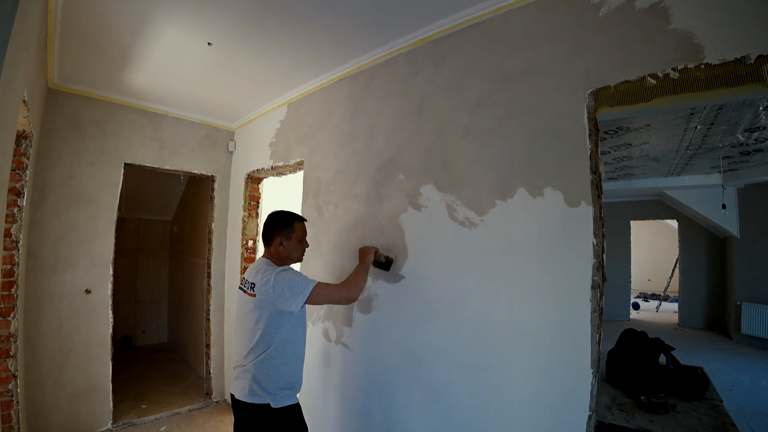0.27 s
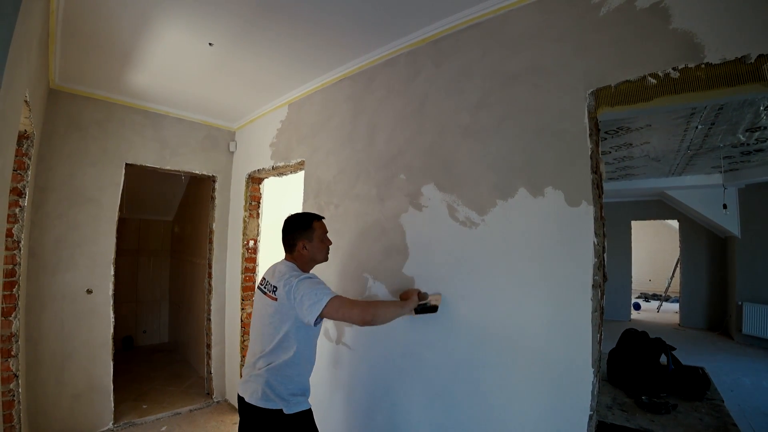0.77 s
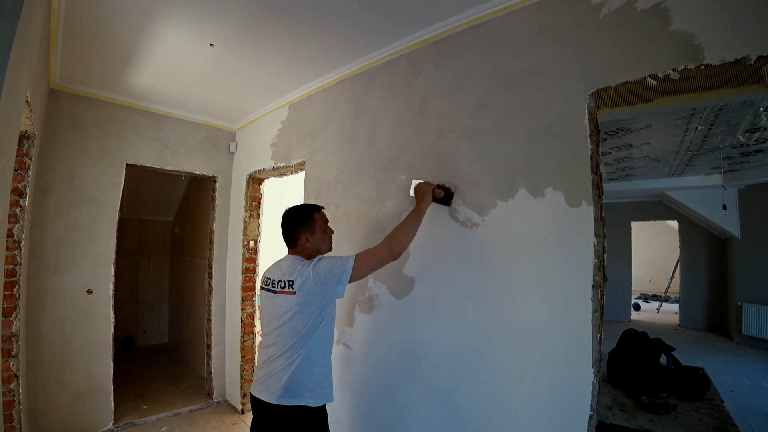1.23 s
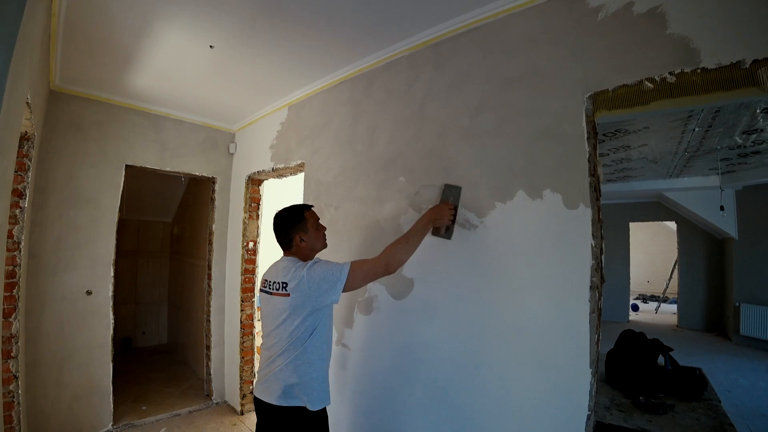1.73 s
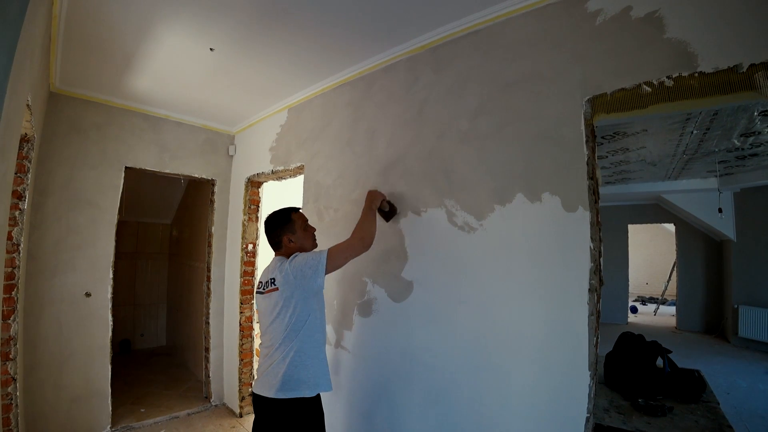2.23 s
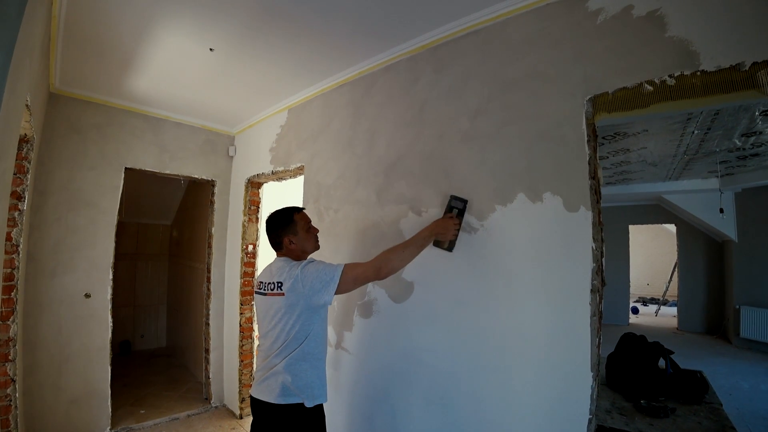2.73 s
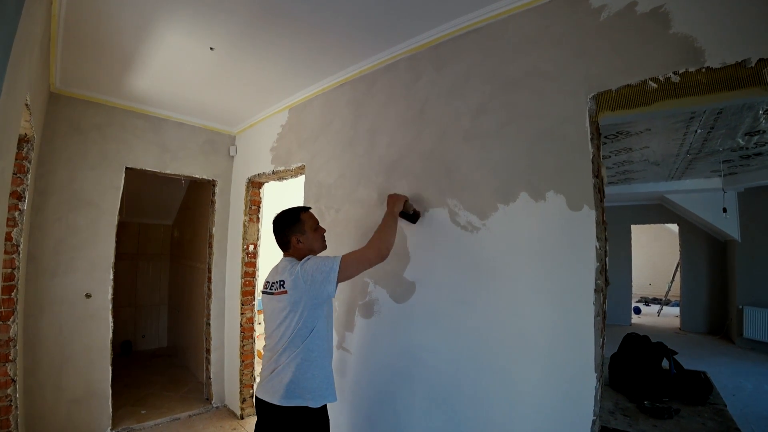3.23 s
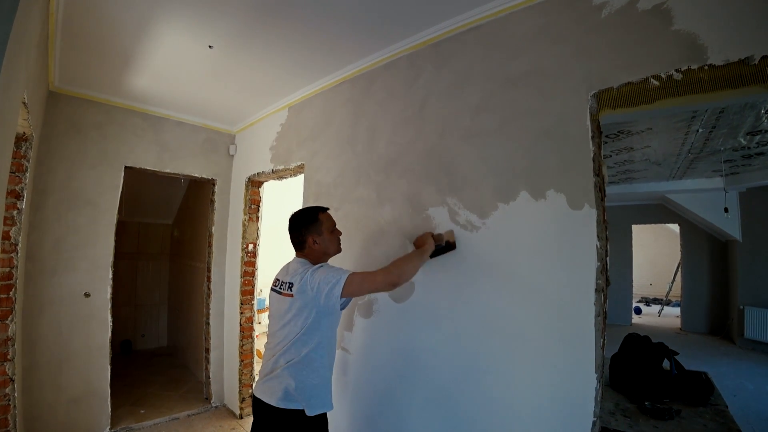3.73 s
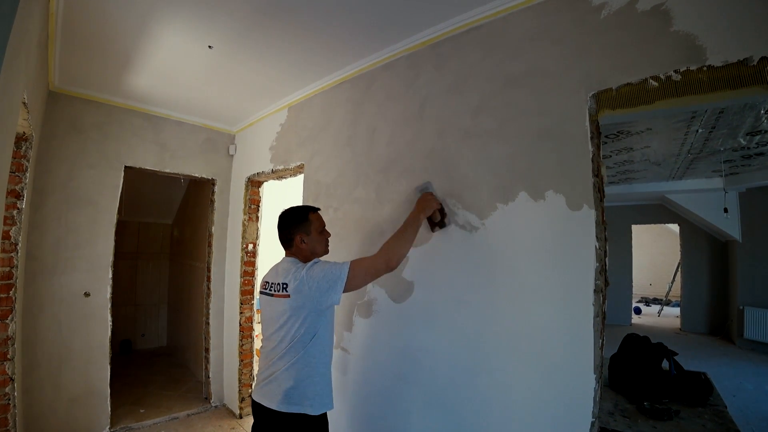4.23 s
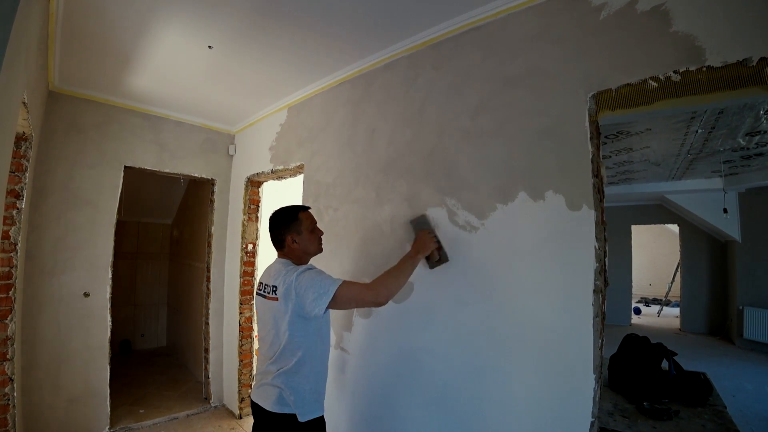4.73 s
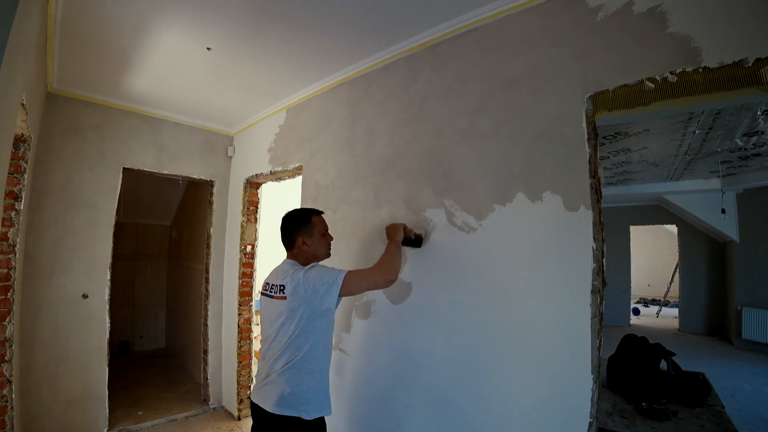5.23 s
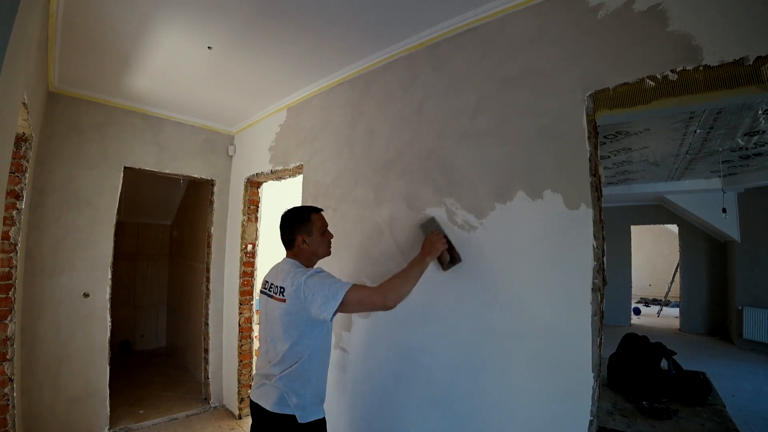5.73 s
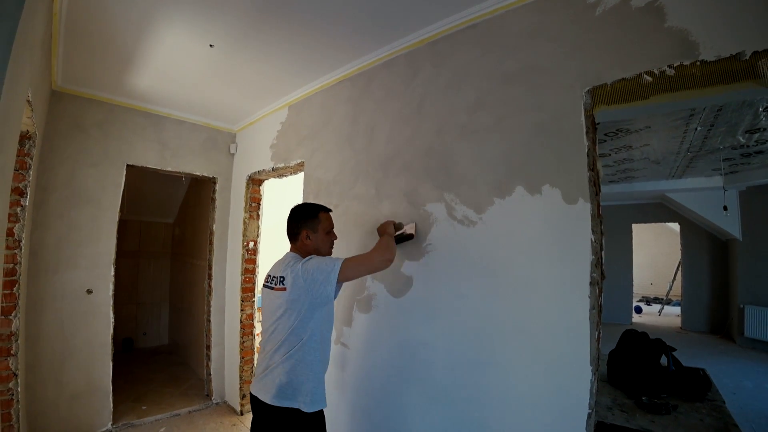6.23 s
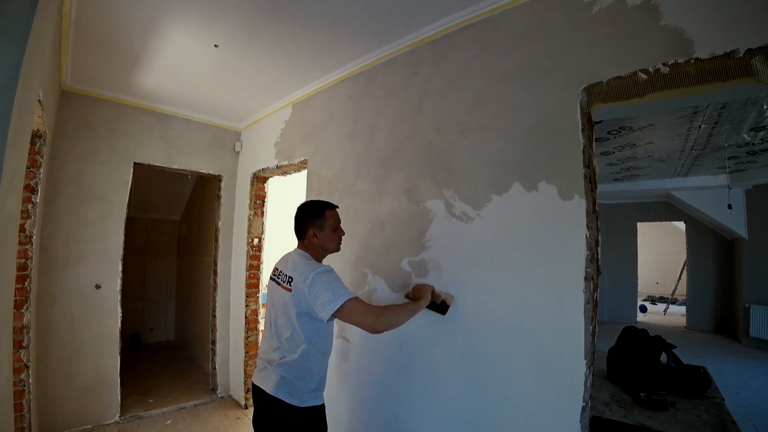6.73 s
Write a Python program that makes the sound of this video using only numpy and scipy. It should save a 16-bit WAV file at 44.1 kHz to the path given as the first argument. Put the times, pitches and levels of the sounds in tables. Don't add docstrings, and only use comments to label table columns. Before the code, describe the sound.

A steel trowel spreads gritty plaster in a bare, echoing interior, heard close through a small, bass-poor microphone pushed to its limit. A sharp tap at once starts a rasping sweep until 0.8 s, hollow wall drumming mixed with metallic ringing and sandy fizz. The echo dies away; a few tiny crumbs patter near 1.25 s. A brief, hard flick scrapes at 1.4 s and rings out. At 1.7 s the blade bites with chattering knocks and sweeps until 2.35 s. After a faint squeak, further strokes run from 2.85 to 3.9, 4.2 to 4.65 and 5.0 to 5.65 s, with clacks at contact and clicks on coarse stones. A thin high squeak at 5.8 s precedes the last scrape, 5.9 to 6.8 s, which decays into room echo and another squeak. Quiet rumble and dull floor knocks lie beneath.

```python
import sys
import numpy as np
from scipy import signal
from scipy.fft import rfft, irfft, next_fast_len
from scipy.io import wavfile
from scipy.ndimage import uniform_filter1d, map_coordinates

SR = 44100
rng = np.random.default_rng(int(sys.argv[2]) if len(sys.argv) > 2 else 0)


def volts(x):
    e = np.asarray(x, float) / 20
    return 10 ** e


def pcm_store(signal):
    levels = np.round(np.clip(np.atleast_2d(signal), -1, 1) * 32767)
    wavfile.write(sys.argv[1], SR, levels.astype(np.int16).T)


N = 307244


def evened(x):
    return x / np.sqrt(np.mean(x ** 2) + 1e-20)


def coloured(x, points):
    size = next_fast_len(len(x))
    f, db = np.transpose(points)
    hz = np.fft.rfftfreq(size, 1 / SR)
    curve_db = np.interp(np.log(hz + 1), np.log(f + 1), db)
    return irfft(rfft(x, size) * volts(curve_db), size)[:len(x)]


def add(mix, s, sound):
    part = mix[round(s * SR):][:len(sound)]
    part += sound[:len(part)]


def resonate(x, hz, width_hz):
    turn = np.exp(2j * np.pi * np.cumsum(hz * np.ones(len(x))) / SR)
    r = np.exp(-np.pi * width_hz / SR)
    return 2 * (turn * signal.lfilter([1 - r], [1, -r], x / turn + 1e-18)).real


def modes(x, table):
    wider = 1 / np.sqrt(np.sqrt(2) - 1)
    total = 0
    for k, (hz, width_hz, db) in enumerate(table):
        once = resonate(x, hz, wider * width_hz)
        total = total + (-1) ** k * volts(db) * resonate(once, hz, wider * width_hz)
    return total


def wander(count, span):
    return evened(uniform_filter1d(uniform_filter1d(rng.standard_normal(count), span), span))


def grit(count, per_s, spread_db):
    sizes_db = spread_db * np.minimum(rng.exponential(1, count), 3.2)
    sizes = volts(sizes_db) * rng.choice([-1., 1.], count)
    return evened(sizes * (rng.random(count) < per_s / SR))


def ringing(count, per_s, fixed, moving, moving_db):
    still = evened(modes(grit(count, per_s, spread_db=2.8), fixed)) * volts(1.3 * wander(count, span=1500))
    bent = evened(modes(grit(count, per_s, spread_db=2.9), moving)) * volts(1.1 * wander(count, span=1500))
    return evened((still + volts(moving_db) * bent) / np.hypot(1, volts(moving_db)))


def fizzing(t):
    # frequency in Hz, level in dB per Hz.
    sand_colour = [(2940, -2), (5000, 14.5), (6440, 13), (14400, 14.5), (15600, 14)]
    sand = coloured(grit(len(t), 16000, spread_db=1.0), sand_colour)
    since = t - t[0] - min(.32 * (t[-1] - t[0]), .26)
    gap_s = .0002 * (1 + 2.6 * since)
    bounce = map_coordinates(sand, [np.arange(len(t)) - SR * gap_s], order=3)
    sand = sand + .55 * np.exp(-(since / .06) ** 2) * bounce
    peak_hz = 10000 + 740 * wander(len(t), span=3000)
    return evened(sand + 0.014 * modes(sand, [(peak_hz, 2500, 0)]))


def stroke(rows, grip, load):
    # frequency in Hz, width in Hz, level in dB.
    blade = [(1535, 152, 10), (2233, 1190, 4)]
    # frequency in Hz, width in Hz, level in dB.
    panel = [(542, 155, -3), (770, 107, 6.5), (1197, 540, 1.5)]
    # time in s, half width in s, rasp in dB, rasp shift in Hz.
    patches = [(.15, 0.055, -1.5, 105), (.36, 0.24, -0.5, -400), (.55, 0.13, -2, 300), (1.8, 0.1, 3, 495),
               (1.98, 0.041, 6, -100), (2.3, 0.042, 0.5, -500), (2.93, 0.07, -3.5, 82),
               (3.12, 0.073, -1, 183), (3.5, 0.092, -2, 97), (3.84, 0.036, -1, -300),
               (4.3, 0.072, 3.5, -300), (4.63, 0.045, 0.5, 102), (5.09, 0.054, 2.5, -200),
               (5.225, 0.023, 3.5, 287), (5.34, 0.05, -1, 107), (6.02, 0.058, 1, -300),
               (6.19, 0.055, 1, 120), (6.45, 0.16, -2, 404)]
    upper_hz, upper_db, wall_bend_db, rasp_bend_db, palm_db = grip
    flat_hz, edge_hz, load_db, load_hz, turn_hz = load
    s, *columns = np.transpose(rows)
    t = np.arange(s[0], s[-1], 1 / SR)
    press_db, flat, speed = (np.interp(t, s, c) for c in columns)

    turn = np.exp(-((s[-1] - 0.14 - t) / 0.046) ** 2)
    edge_flex_hz, flat_ring_hz = 1150, 1500
    flex_hz = flat_hz + (edge_flex_hz - flat_hz) * np.clip(1 - 2.7 * flat, 0, 1)
    low_hz = flat_ring_hz + (edge_hz - flat_ring_hz) * np.clip(1 - 1.54 * flat, 0, 1)
    high_hz = upper_hz + 270 * (.3 - flat)
    at, half, patch_db, patch_hz = np.transpose(patches)
    on_patch = np.exp(-((t[:, None] - at) / half) ** 2)
    gritty_db = on_patch @ patch_db
    rasp_hz = np.minimum(load_hz + turn_hz * turn + on_patch @ patch_hz, 5160)
    judder = wander(len(t), span=300)

    wall = ringing(len(t), 3000, panel, [(flex_hz, 240, 0)], wall_bend_db)
    steel = [(blade[0][0], blade[0][1], blade[0][2] + palm_db)] + blade[1:]
    free_db = -4 - 3 * (low_hz - flat_ring_hz) / 350 - 0.79 * gritty_db
    ring = ringing(len(t), 5000, steel, [(low_hz, 170, 0), (high_hz, 200, upper_db)], free_db)
    rasp = ringing(len(t), 9000, [(4320, 2400, 0)], [(rasp_hz, 1100, 0)], rasp_bend_db)
    fizz = fizzing(t)

    sound = volts(-22 + 26 * flat + 0.35 * judder) * wall
    ring_db = -5 + 1.9 * flat - 0.34 * gritty_db + 1.24 * judder
    sound += volts(ring_db) * ring * np.minimum((t - t[0]) / .02, 1)
    sound += volts(-6 + load_db + 2.1 * speed + 0.5 * turn + gritty_db + 0.47 * judder) * rasp
    sound += volts(-22.5 + 28 * speed + 0.75 * judder) * fizz
    fade = np.minimum(np.minimum((t - t[0]) / .003, (t[-1] - t) / .022), 1)
    return s[0], volts(press_db) * sound * fade


def add_strokes(trowel):
    # time in s, pressure in dB, blade flat on the wall 0-1, speed 0-1.
    sweep_1 = [(.03, -24.5, 0.4, 0.7), (.06, -16.5, 0.8, 0.27), (.155, -11, 0.5, 0.48),
               (.22, -14.5, 0.76, 0.5), (.29, -16.5, 0.3, 0.46), (.345, -16.5, 0.29, 0.66),
               (.55, -14, 0.49, 0.68), (.745, -12, 0.47, 0.49), (0.797, -11, 0.2, 0.75)]
    flick = [(1.377, -23, .02, 0.46), (1.389, -12.5, 0.09, 0.98), (1.41, -11, 0.57, 0.76),
             (1.43, -20.5, 0.91, 0.58), (1.447, -17.5, 0.93, .1), (1.49, -54, 0.84, .02),
             (1.6, -33, 0.37, 0.58), (1.7, -39, 0.56, 0.62)]
    sweep_2 = [(1.724, -16.5, 1, 0.26), (1.758, -25.5, 0.84, 0.88), (1.766, -23, 0.98, 0.79),
               (1.87, -16.5, 0.51, 0.52), (1.99, -14, 0.2, 0.67), (2.06, -16, 0.3, 0.5),
               (2.15, -17, 0.5, 0.7), (2.32, -12, 0.22, 0.49), (2.358, -20, 0.12, .3)]
    sweep_3 = [(2.868, -28, 0.44, 0.58), (2.903, -16.5, 0.79, 0.37), (2.943, -12.5, 0.53, 0.33),
               (3.113, -16, 0.6, 0.59), (3.597, -17.5, 0.31, 0.71), (3.677, -16, 0.082, 0.83),
               (3.786, -13, 0.31, 0.67), (3.846, -14.5, 0.74, 0.46), (3.877, -9.5, 0.31, 0.61)]
    sweep_4 = [(4.195, -27, 0.19, 0.67), (4.22, -22, 0.24, 0.59), (4.295, -12.5, 0.59, 0.24),
               (4.325, -14, 0.52, 0.27), (4.51, -11, 0.039, 0.64), (4.553, -23.5, 0, 1),
               (4.567, -10.5, 0.0, 0.65), (4.615, -12, 0.065, 0.57), (4.659, -12.5, 0.17, 0.22)]
    sweep_5 = [(5.012, -12.5, 0.49, 0.33), (5.132, -11.5, 0.6, 0.27), (5.176, -16.5, 0.48, 0.6),
               (5.252, -10, 0.13, 0.43), (5.306, -18.5, 0.072, 0.69), (5.396, -13.5, .02, 0.56),
               (5.478, -11.5, 0.044, 0.64), (5.544, -12.5, 0.29, 0.62), (5.644, -21.5, 0.9, 0.51)]
    sweep_6 = [(5.9, -25, 0.5, 0.77), (5.93, -28.5, 0.85, 0.77), (5.946, -12.5, 0.66, 0.22),
               (6.044, -12, 0.57, 0.26), (6.098, -18, 0.61, 0.71), (6.152, -13.5, 0.48, 0.54),
               (6.468, -14, 0.14, 0.59), (6.65, -11, 0.14, 0.55), (6.78, -21.5, 0.85, 0.65)]
    # upper blade mode in Hz, its level in dB, share of the bending modes
    # in the wall in dB and in the rasp in dB, palm damping the steel in dB.
    grips = [(2280, -23, 11, -6.5, -4), (2170, -2, 9, 2, -8), (2290, -29, -1, 5, -4),
             (2320, -2.5, -16, 4, -3), (2250, -4, 5, 4, -3), (2320, -9, 3.5, 7.5, -0.5),
             (2380, -7, 1.5, 7, -2)]
    # flex in Hz when flat, low ring in Hz on edge, rasp in dB,
    # rasp in Hz, rise of the rasp at the wrist turn in Hz.
    loads = [(1117, 1720, 2.6, 3100, 260), (1240, 1940, -1, 4000, 30), (1140, 1740, -4.5, 3880, 30),
             (880, 2110, 1.05, 3530, 1500), (880, 1610, -0.5, 3620, 230), (930, 1880, 1, 3520, 3900),
             (953, 1860, 2.5, 3490, 3500)]
    paths = [sweep_1, flick, sweep_2, sweep_3, sweep_4, sweep_5, sweep_6]
    for row in zip(paths, grips, loads):
        add(trowel, *stroke(*row))


def tap(s, db, hz, crack_db, t60):
    t = np.arange(3000) / SR
    ring = volts(-60 * t / t60) * np.sin(2 * np.pi * hz * t)
    crack = evened(modes(rng.standard_normal(len(t)), [(3000, 1100, 0), (5400, 2000, -9)]))
    crack = crack * volts(crack_db - 60 * t / t60)
    return s, volts(db) * (ring + crack) * np.minimum(t / 0.00025, 1)


def add_taps(trowel):
    # time in s, peak in dB, ring in Hz, bright crack in dB, time to fall 60 dB in s.
    touches = [(.018, -7, 1410, -12, 0.042), (0.0206, -1.5, 1100, -6, 0.02), (1.2267, -20, 1650, -6, 0.01),
               (1.723, -14, 1260, -12, 0.021), (1.7631, -7.5, 1150, -15, 0.022),
               (2.826, -15.5, 1620, -6, 0.017), (2.829, -29.5, 1540, -2, 0.1),
               (2.845, -8.5, 770, -22, 0.011), (2.8455, -16, 1320, -28, 0.015),
               (2.846, -19, 2170, -20, 0.017), (2.861, -16, 704, -8, 0.034), (4.179, -27, 1500, -2, 0.088),
               (4.1866, 0.5, 880, -6.5, 0.014), (4.1866, -6, 2800, -13, 0.014),
               (4.1863, -12, 3670, -8, 0.0095), (4.187, -12.5, 1450, -27, 0.032),
               (5.0018, -17.5, 1454, -1, 0.096), (5.0076, -8, 880, 0.5, 0.035),
               (5.899, -17.5, 1660, -2, 0.062), (5.941, -9.5, 850, -11, 0.047)]
    # time in s, peak in dB, pitch in Hz.
    chatter = [(1.732, -20, 972), (1.739, -7, 1320), (1.774, -7, 1010), (1.785, -7, 1220),
               (1.815, -16, 1220), (1.832, -1, 1560), (1.865, -5, 1150), (1.887, -11, 1700)]
    # time in s, peak in dB, pitch in Hz.
    catches = [(.3606, -12, 2300), (.3795, -6, 2000), (.3875, -8, 2420), (.576, -7, 1150),
               (.745, -5.5, 800), (1.4195, -4, 1720), (1.436, -6, 1280), (1.7965, -4, 1520),
               (1.943, -7, 1720), (2.885, -16, 1890), (2.8989, -13, 2290), (4.2179, -26, 848),
               (4.5637, -4, 1750), (4.636, -4, 2380), (5.036, -2, 2770), (5.1964, -1, 3130),
               (5.7913, -21, 1620), (5.984, 0.5, 2750)]
    for row in touches:
        add(trowel, *tap(*row))
    for s, db, hz in chatter:
        add(trowel, *tap(s, db - 3.0, hz, -22, 0.022))
    for s, db, hz in catches:
        add(trowel, *tap(s, db - 1.5, hz, -10, 0.018))


def ridge(s, length, from_hz, to_hz, db, share):
    hz = np.linspace(from_hz, to_hz, round(length * SR))
    sound = modes(grit(len(hz), 5000, spread_db=1.5), [(hz, share * from_hz, 0)])
    return s, volts(db) * evened(sound) * signal.windows.tukey(len(hz), .6)


def add_ridges(trowel):
    # start in s, length in s, from Hz, to Hz, level in dB.
    singing = [(.06, 0.18, 4040, 4150, -18), (.24, 0.24, 2320, 2260, -22.5), (.25, 0.26, 2600, 2950, -25),
               (0.419, 0.51, 1630, 1570, -33), (.46, 0.27, 816, 780, -28), (5.193, 0.061, 3950, 3800, -22),
               (1.781, 0.19, 1350, 1424, -22), (1.76, 0.231, 1034, 1216, -21.5),
               (1.771, 0.3, 1600, 1720, -19), (2.053, 0.27, 1570, 1490, -23),
               (2.182, 0.18, 2280, 2730, -27), (2.9, 0.11, 2300, 2220, -33),
               (2.901, 0.31, 1620, 1530, -25.5), (2.978, 0.35, 3830, 4030, -22.5),
               (3.21, 0.1, 2320, 2220, -19), (3.332, 0.24, 1780, 1750, -24), (3.599, 0.27, 1790, 2020, -27),
               (3.735, 0.12, 2270, 2380, -21), (3.497, 0.38, 3630, 3650, -27),
               (3.632, 0.14, 4700, 4940, -23), (4.239, 0.16, 3150, 3300, -21.5),
               (4.284, 0.13, 2620, 2630, -19.5), (4.429, 0.13, 1700, 1950, -21),
               (4.56, 0.08, 2060, 2230, -16), (4.555, 0.065, 1860, 1480, -20),
               (5.017, 0.19, 2510, 2590, -20), (5.034, 0.23, 3100, 3260, -35),
               (5.181, 0.29, 4050, 4180, -30), (5.268, 0.14, 2160, 1820, -21.5),
               (5.497, 0.17, 2360, 2380, -22), (5.949, 0.44, 2700, 2650, -23.5),
               (5.949, 0.36, 3030, 3060, -22), (6.286, 0.19, 2320, 2250, -20.5),
               (6.38, 0.39, 1650, 1780, -26), (6.558, 0.26, 2530, 2260, -23.5),
               (6.082, 0.33, 980, 1137, -23.5), (5.959, 0.56, 1590, 1640, -25.5),
               (3.03, 0.16, 4320, 4400, -24), (3.33, .2, 4200, 3956, -28), (3.38, .17, 2250, 2330, -28)]
    # start in s, length in s, from Hz, to Hz, level in dB.
    sheen = [(0.202, 0.11, 9500, 8400, -24), (1.76, .16, 11500, 10400, -35),
             (2.13, 0.13, 12100, 10500, -23), (3.2, .14, 11100, 9500, -24.5),
             (4.274, 0.13, 13600, 12000, -24.5), (4.434, .12, 14000, 13500, -31),
             (5.193, .1, 10500, 8500, -29), (6.123, 0.1, 11000, 8450, -21.5)]
    for row in singing:
        add(trowel, *ridge(*row, 0.072))
    for row in sheen:
        add(trowel, *ridge(*row, 0.18))


def crumb(s, db):
    t = np.arange(900) / SR
    patter = evened(modes(rng.standard_normal(len(t)), [(13000, 5600, 0)]))
    return s, volts(db - 4.0 - 60 * t / .04) * np.minimum(t / .002, 1) * patter


def add_loose_grains(trowel):
    # time in s, peak in dB.
    crumbs = [
        (1.2261, -46),
        (1.2404, -36),
        (1.274, -41),
        (1.295, -34),
    ]
    falling = grit(6500, 2500, spread_db=-2.0) * volts(2.9 * wander(6500, span=300))
    add(trowel, 1.222, volts(-57) * np.diff(falling))
    brush = grit(2200, 6000, spread_db=-5.0)
    add(trowel, 2.824, volts(-43) * np.diff(brush))
    for row in crumbs:
        add(trowel, *crumb(*row))
    graze = evened(modes(grit(2600, 9800, spread_db=3.0), [(4550, 3500, 4), (9500, 4500, 3)]))
    add(trowel, 1.322, volts(np.linspace(-58, -43, 2600)) * graze)


def squeak(rows):
    s, hz, db = np.transpose(rows)
    t = np.arange(s[0], s[-1], 1 / SR)
    tone = evened(resonate(rng.standard_normal(len(t)), np.interp(t, s, hz), 60))
    return s[0], volts(np.interp(t, s, db)) * tone * signal.windows.tukey(len(t), .2)


def add_squeaks(trowel):
    # time in s, pitch in Hz, level in dB.
    squeaks = [
        [(2.72, 11000, -72), (2.755, 11500, -65), (2.78, 11000, -68), (2.82, 11200, -62)],
        [(5.77, 12500, -66), (5.8, 13100, -60), (5.85, 13200, -60), (5.895, 12400, -62)],
        [(5.79, 14300, -68), (5.82, 14650, -64), (5.85, 14600, -65), (5.88, 14200, -66)],
        [(6.89, 12300, -66), (6.93, 12900, -63), (6.966, 13200, -63)],
        [(6.92, 14300, -66), (6.966, 14800, -63)],
    ]
    for rows in squeaks:
        add(trowel, *squeak(rows))


def tail():
    # frequency in Hz, time to fall 60 dB in s.
    decay = [(250, 0.45), (600, 1.57), (760, 1.43), (1100, 1.09), (1700, 1.1), (4590, 0.96), (8000, 0.82),
             (15000, 0.28)]
    count = 5 * SR // 4
    taps = np.zeros(count)
    at = np.arange(200, count - 20, 20)
    taps[at + rng.integers(0, 20, len(at))] = rng.choice([-1., 1.], len(at))
    hz, t, z = signal.stft(taps, SR, nperseg=512)
    f, t60 = np.transpose(decay)
    band_t60 = np.interp(np.log(hz + 1), np.log(f), t60)[:, None]
    echo = signal.istft(z * volts(-60 * t / band_t60), SR, nperseg=512)[1]
    return echo / np.linalg.norm(echo)


def room(x):
    places, place_s = 8, .012
    step = np.arange(N) / SR / place_s
    echoes = np.zeros(N)
    for k in range(places):
        away = np.minimum(abs((step - k) % places - 1), 1)
        echoes += signal.fftconvolve(x * np.cos(np.pi / 2 * away), tail())[:N]
    return echoes


def ring_out(s, hz, db, t60):
    t = np.arange(SR // 2) / SR
    note = evened(modes(rng.standard_normal(len(t)), [(hz, 9, 0)]))
    return s, volts(db - 60 * t / t60) * note * signal.windows.tukey(len(t), .1)


def hum(s, length, hz, db):
    share = np.linspace(0, 1, round(length * SR))
    tone = evened(resonate(rng.standard_normal(len(share)), hz, 5.6))
    return s, volts(db - 0.68 * share) * tone * signal.windows.tukey(len(share), .4)


def thump(s, db, hz, t60):
    t = np.arange(SR // 3) / SR
    return s, volts(db - 60 * t / t60) * np.sin(2 * np.pi * hz * t) * np.minimum(t / 0.004, 1)


def background(trowel):
    # frequency in Hz, level in dB per Hz.
    rumble_colour = [(12, -26), (20, 5.5), (59, 9), (129, -0.5), (236, -6), (300, -34), (520, -70),
                     (880, -120)]
    # time in s, level in dB.
    rumble_db = [(0.0, -55.5), (.8, -58), (1.1, -51), (1.92, -54), (2.79, -52.5), (3.18, -56), (5.9, -55.5),
                 (6.1, -62), (6.96, -52)]
    # frequency in Hz, width in Hz, level in dB.
    thrum = [(298, 150, 3)]
    # frequency in Hz, level in dB per Hz.
    hush = [(180, -33), (300, -10), (378, -10), (425, -13), (1490, -3), (8890, -28), (11400, -25),
            (15600, -31)]
    # start in s, length in s, Hz, dB.
    hums = [(0.087, 0.12, 550, -33), (0.043, 0.48, 290, -50), (0.51, 0.27, 314, -48),
            (1.571, 0.093, 328, -45), (1.59, 0.13, 168, -45), (1.719, 0.094, 230, -43),
            (3.225, 0.23, 328, -45), (3.25, 0.28, 180, -52), (4.26, 0.094, 860, -25),
            (4.412, 0.19, 335, -45.5), (4.416, 0.1, 553, -34), (.01, 0.84, 45, -53), (4.4, 1.5, 76, -52.5),
            (6.1, .4, 42, -58), (.73, 0.04, 730, -23), (3.784, 0.067, 750, -23.5), (2.2, 0.16, 800, -28),
            (1.29, .035, 2080, -51)]
    # start in s, pitch in Hz, level in dB,
    # time to fall 60 dB in s.
    rings = [(0.8, 756, -31, 1.65), (.8, 1524, -31, 1.6), (1.44, 1657, -29, 0.85), (1.44, 1144, -29, 1),
             (1.42, 1347, -24, 0.87), (1.44, 1540, -29, 1.2), (6.769, 1552, -27.5, 1.1)]
    # time in s, level
    # in dB, pitch in Hz, time to fall 60 dB in s.
    thumps = [(1.36, -25, 36, 0.14), (1.2, -36, 115, .1), (3.1, -41.5, 240, 0.44), (5.72, -38, 82, 0.48),
              (1.641, -28.5, 60, 0.51), (2.127, -26, 46, 0.081), (2.87, -35, 54, .2), (3.99, -35, 43, 0.18),
              (3.8, -12, 155, 0.017), (4.55, -39, 160, .06), (5.01, -37, 270, 0.21),
              (5.939, -22, 230, 0.026), (5.12, -41, 180, 0.066)]
    shake = evened(np.sqrt(abs(uniform_filter1d(trowel ** 2, size=4000))))
    a, b, c = rng.standard_normal((3, N))
    swell_db = np.interp(np.arange(N) / SR, *np.transpose(rumble_db)) + 4.0 - wander(N, span=9000)
    out = volts(swell_db) * evened(coloured(a, rumble_colour))
    out += volts(-54) * (0.7 + 0.33 * shake) * evened(modes(b, thrum))
    out += volts(-51) * evened(coloured(c, hush))
    add(out, 0, volts(-36) * evened(modes(c[:800], [(1780, 3600, 0)])))
    for row in hums:
        add(out, *hum(*row))
    for row in rings:
        add(out, *ring_out(*row))
    for row in thumps:
        add(out, *thump(*row))
    return out


def filled(x):
    moments = [.075, .328, .449, .542, .61, .68, 3.095, 3.49, 3.559, 3.583, 4.396, 5.485, 5.58, 6.16]
    # lowest in Hz, highest in Hz.
    from_hz = [(4200, 6500), (7000, 13800)]
    side, hz = np.zeros(N), np.fft.rfftfreq(2048, 1 / SR)
    window = signal.windows.kaiser_bessel_derived(2048, 4 * np.pi) ** 2
    lows = rng.uniform(*np.transpose(from_hz), (len(moments), 2))
    for s, edges in zip(moments, lows):
        frame = x[0, round(s * SR) - 1024:][:2048][::-1]
        inside = sum((hz > low) * (hz < 1.24 * low) for low in edges)
        band = irfft(rfft(frame) * inside)
        add(side, s - 1024 / SR, volts(-1.5) * band * window)
    return x + np.array([side, -side])


def scene():
    # frequency in Hz, dB.
    send = [(900, 1), (1300, 1), (1600, -0.5), (2000, 0), (2400, -1), (3200, -0.5)]
    # frequency in Hz, level in dB.
    mic = [(100, -48), (300, -21.5), (480, -3.5), (700, 1), (5000, -0.5), (16000, -6)]
    trowel = np.zeros(N)
    add_strokes(trowel)
    add_taps(trowel)
    add_ridges(trowel)
    add_loose_grains(trowel)
    add_squeaks(trowel)
    echoes = volts(-7) * room(coloured(trowel, send))
    heard = coloured(trowel + echoes, mic) + background(trowel)
    return np.array([heard, heard])


def roll_off(x):
    return signal.sosfilt(signal.butter(12, 15750, fs=SR, output="sos"), x)


def record(dry):
    clipped = np.clip(dry, -.985, .985)
    low_pass = signal.firwin(511, 15750, window=("kaiser", 9), fs=SR)
    limited = signal.oaconvolve(clipped, low_pass[None], "same")
    mix = filled(limited)
    return roll_off(mix)


dry = scene()
out = record(dry)
pcm_store(out)
```